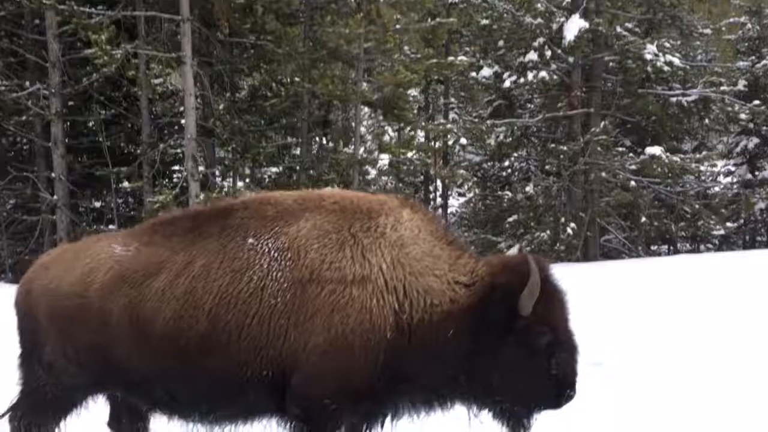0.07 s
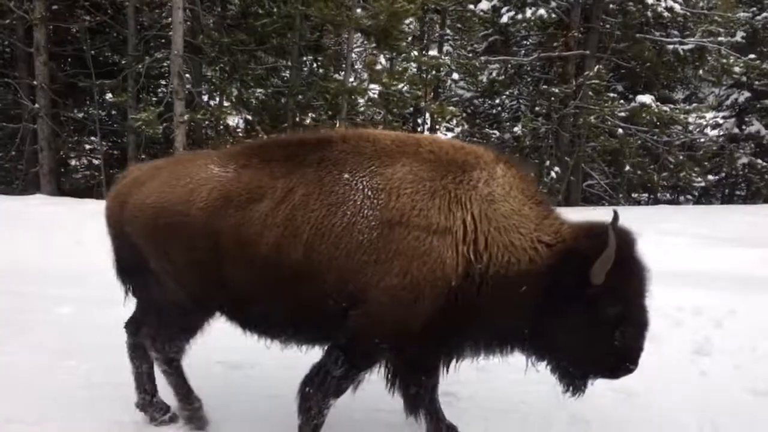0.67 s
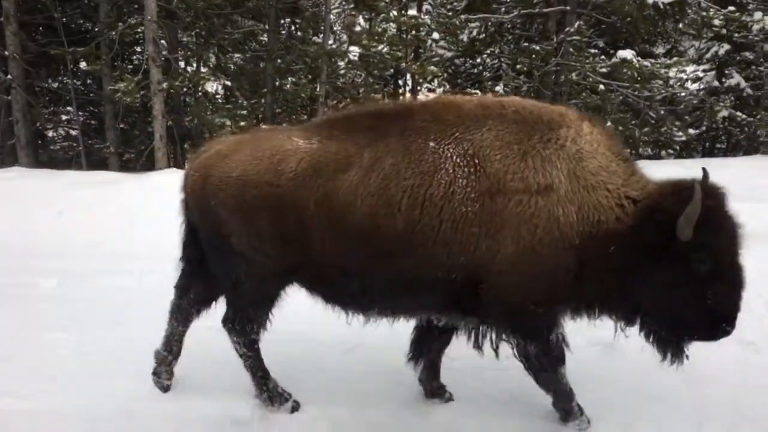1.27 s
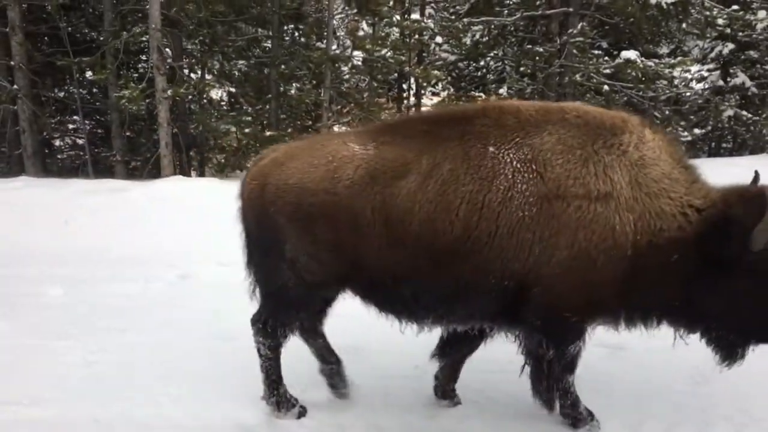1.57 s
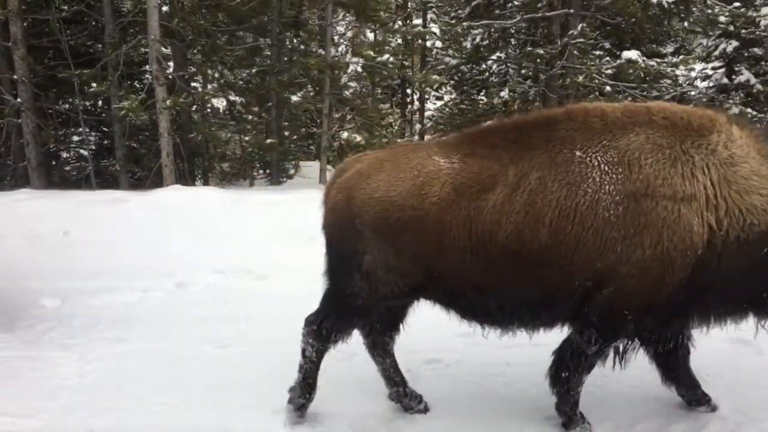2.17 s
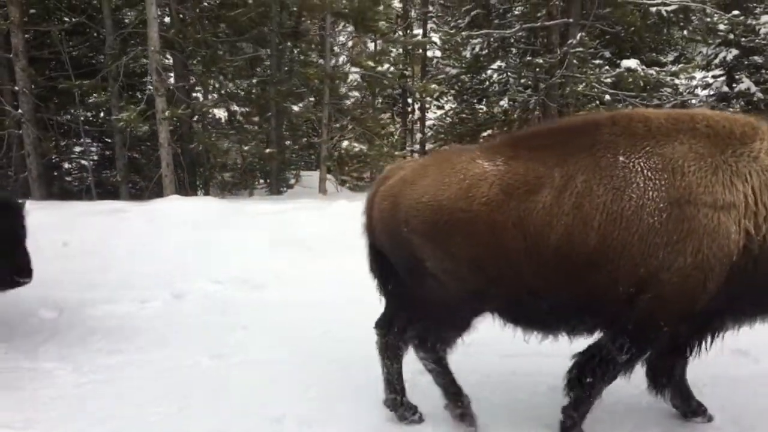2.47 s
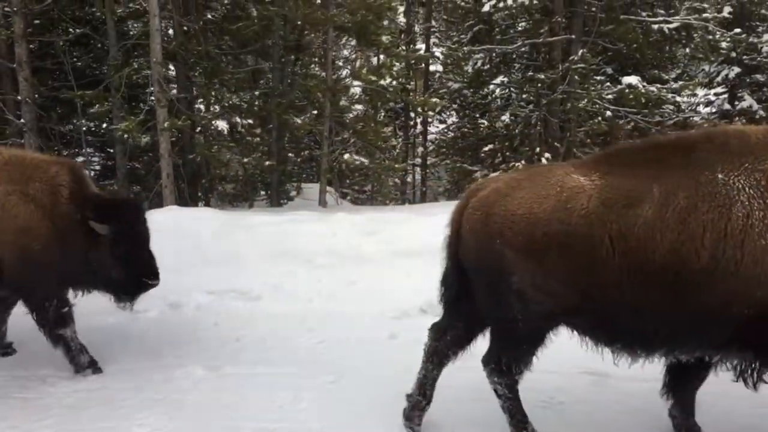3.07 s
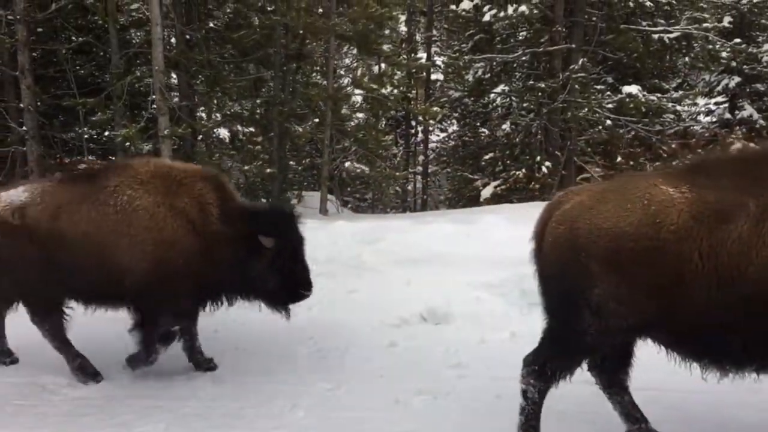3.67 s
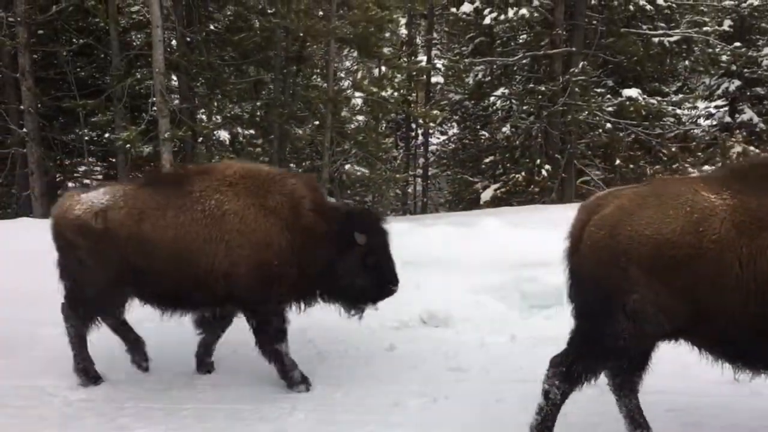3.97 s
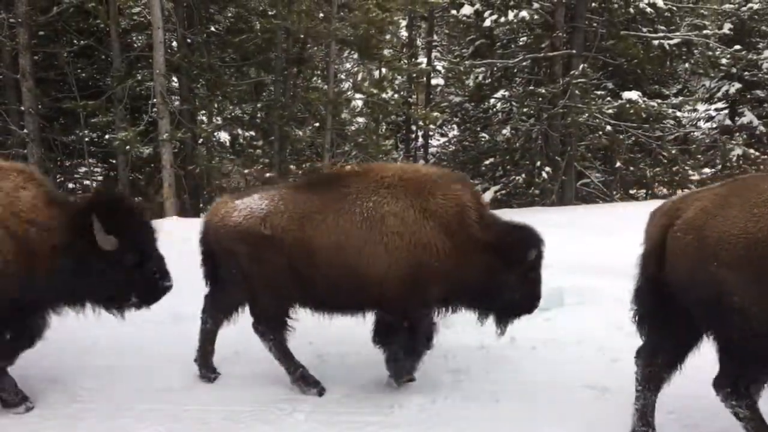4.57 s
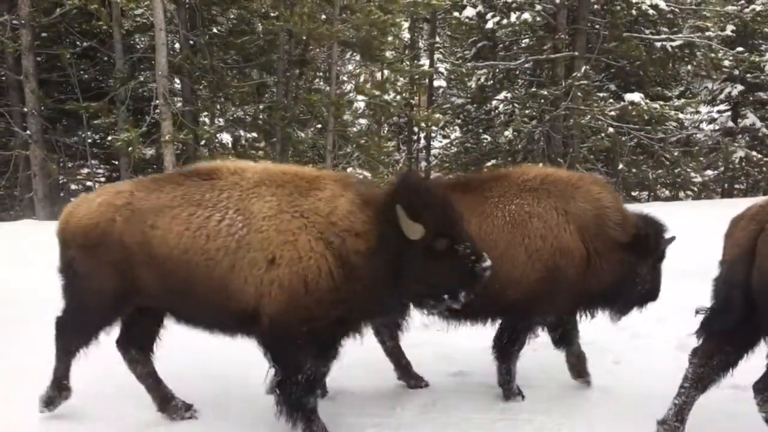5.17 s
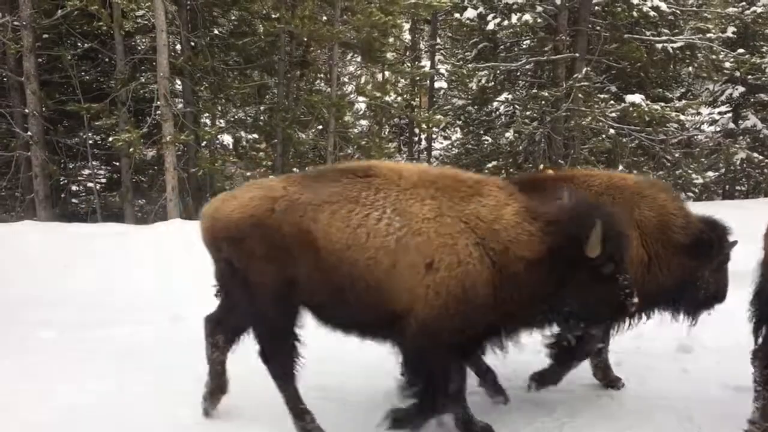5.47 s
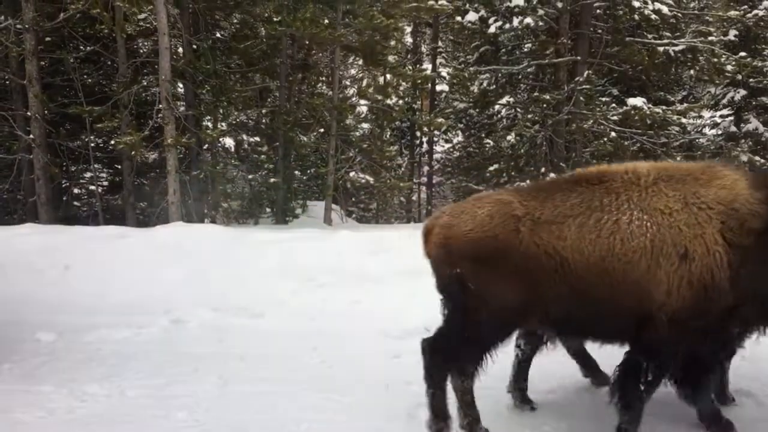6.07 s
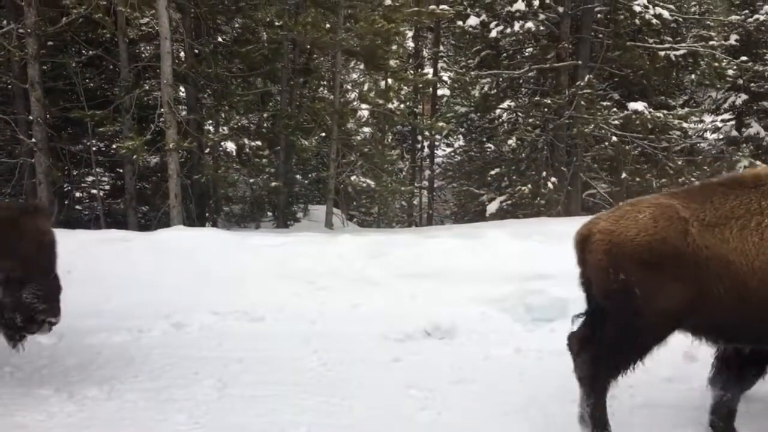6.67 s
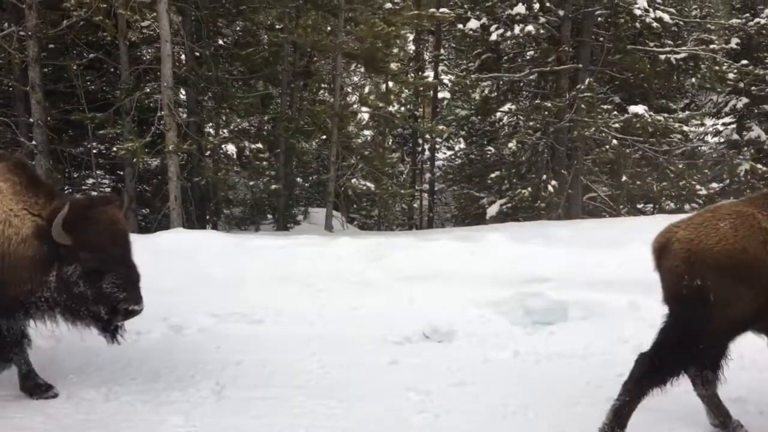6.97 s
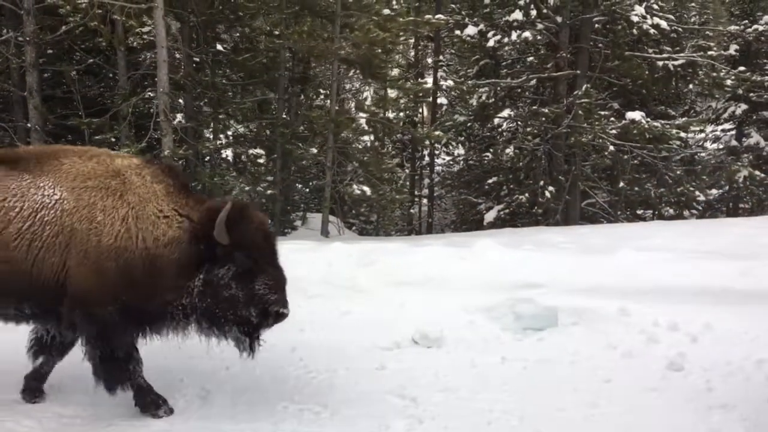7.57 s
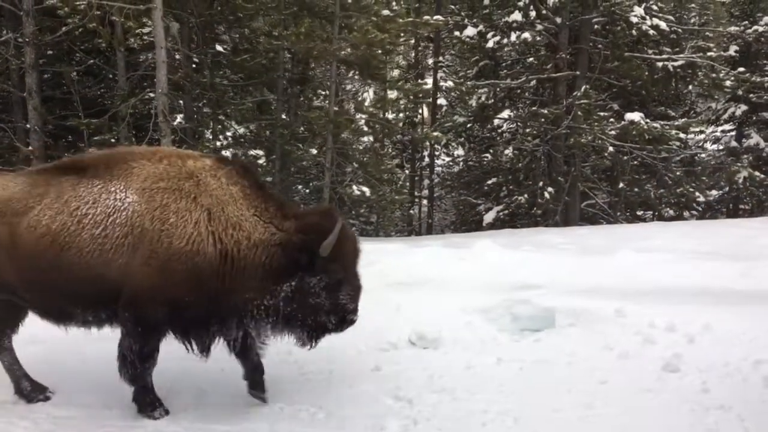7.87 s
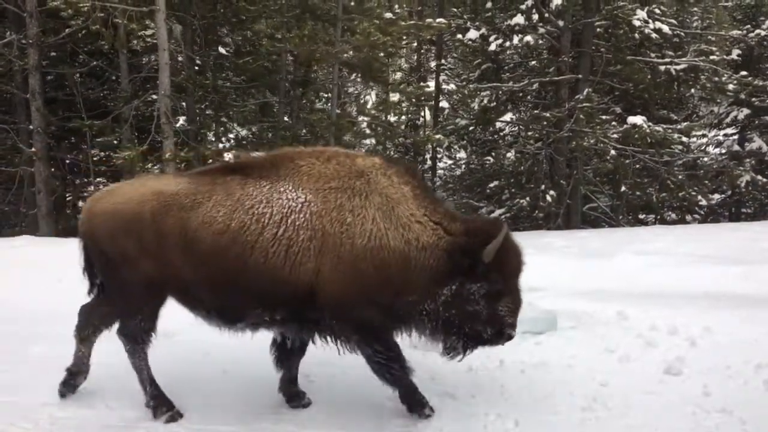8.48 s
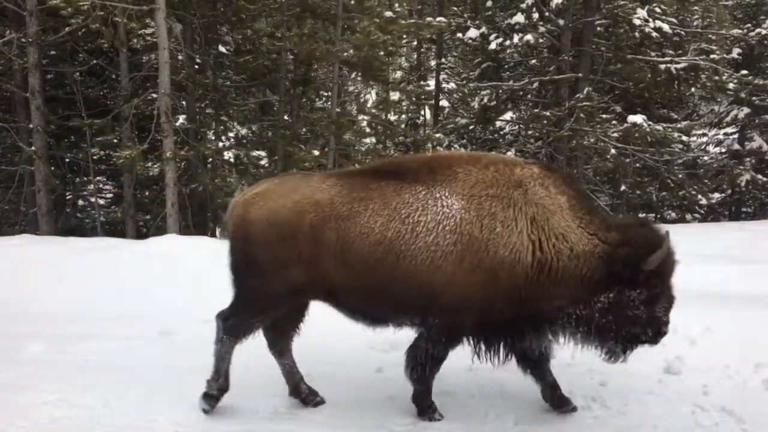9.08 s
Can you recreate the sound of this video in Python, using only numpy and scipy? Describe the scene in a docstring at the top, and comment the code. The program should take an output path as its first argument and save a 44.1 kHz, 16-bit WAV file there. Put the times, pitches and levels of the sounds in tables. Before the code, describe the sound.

Low engine idle heard from inside a vehicle, revving up briefly two times over the steady rush of a heater fan.

```python
"""Snow vehicle idling, heard on board

The engine hunts: two times its speed jumps and slowly sags, and the body rumbles harder at each surge.
Firings drive the exhaust note, boom in the cabin and shake the panels, with occasional dull thumps.
A heater fan blows steadily through resonant ducts.
On top: a brief high hiss at the start, a few tiny rustles and one click."""
import sys
import numpy as np
from scipy import signal
from scipy.fft import rfft, irfft
from scipy.io import wavfile
from scipy.ndimage import uniform_filter1d

SR = 44100
rng = np.random.default_rng(int(sys.argv[2]) if len(sys.argv) > 2 else 0)


def generate_wav(sig):
    """Save sig (samples, or channels by samples) to the path in sys.argv[1] as 16-bit PCM at SR."""
    pcm = np.round(np.clip(np.atleast_2d(sig).T, -1, 1) * 32767).astype(np.int16)
    wavfile.write(sys.argv[1], SR, pcm)


N = 411012
TIME_S = np.arange(N) / SR
BINS_HZ = np.maximum(np.arange(N // 2 + 1) * SR / N, 1)
IDLE_HZ = 38.8   # firing rate at rest

# engine surges: peak t/s, rise/s, peak firing rate/Hz
ENGINE_SURGES = [(1.761, .36, 67), (7.06, .56, 64.5)]
# panel modes: f/Hz, width/Hz, lift/dB
PANEL_RESONANCES = [(239, 9, 4.5), (278, 14, 8)]


def from_db(db):
    """Decibels to gain."""
    return 10 ** (np.asarray(db) / 20)


def unit_rms(x):
    """Scale to rms 1."""
    return x / np.sqrt(np.mean(x ** 2) + 1e-20)


def hump(centre_s, half_s):
    """Gaussian of height 1, down to 1/e at half_s from its centre."""
    return np.exp(-((TIME_S - centre_s) / half_s) ** 2)


def swing_db(rows):
    """Level change from rounded swells and dips."""
    return sum(db * hump(t_s, half_s) for t_s, db, half_s in rows)


def burst_gain(rows):
    """Envelope of short, rounded bursts."""
    return sum(from_db(db) * hump(t_s, half_s) for t_s, db, half_s in rows)


def drift(rate_hz):
    """Slow random wander, rms 1."""
    return unit_rms(irfft(rfft(rng.standard_normal(N)) / (1 + (BINS_HZ / rate_hz) ** 2), N))


def coloured(x, spectrum, resonances=(), skirt_db_per_oct=30):
    """Apply a broad spectrum, a roll-off above it and narrow resonances; rms 1."""
    hz, db = np.transpose(spectrum)
    shape_db = np.interp(np.log(BINS_HZ), np.log(hz), db)
    shape_db -= skirt_db_per_oct * np.maximum(np.log2(BINS_HZ / hz[-1]), 0)
    for centre_hz, width_hz, lift_db in resonances:
        shape_db += lift_db / (1 + (2 * (BINS_HZ - centre_hz) / width_hz) ** 2)
    return unit_rms(irfft(rfft(x) * from_db(shape_db), N))


def steadied(x, span_s):
    """Level out slow swells of a noise, keeping its fast grain."""
    return x / np.sqrt(uniform_filter1d(x ** 2, max(int(span_s * SR), 2)) + 1e-9)


def firing_rate_hz(start_hz=43.75, settle_hz=14, settle_s=.7, sag_hz_per_s=3.35):
    """Hunting engine: each surge climbs smoothly, drops back, then sags towards idle."""
    hz = np.maximum(start_hz - sag_hz_per_s * TIME_S, IDLE_HZ)
    for peak_s, rise_s, peak_hz in ENGINE_SURGES:
        since_s = np.maximum(TIME_S - peak_s, 0)
        rising_hz = IDLE_HZ + (peak_hz - IDLE_HZ) * hump(peak_s, rise_s)
        falling_hz = peak_hz - settle_hz * (1 - np.exp(-since_s / settle_s)) - sag_hz_per_s * since_s
        hz = np.maximum(hz, np.where(TIME_S < peak_s, rising_hz, falling_hz))
    return hz


def firing_level_db(firing_hz, base_db=-40, db_per_oct=6.5, mode_hz=45.9, width_hz=6.5, lift_db=11.5):
    """The firing note grows with speed and booms as it crosses the cabin's lowest mode."""
    # brief swells and dips: t/s, change/dB, half length/s
    swings = [(0.323, 4, 0.14), (.95, -4, 0.26), (1.48, 9.5, 0.048), (2.85, 4, .12), (3.45, -3, 0.18),
              (4.27, -8.5, 0.093), (4.52, 4.5, 0.15), (5.45, -4.5, 0.18), (6.65, 6, 0.1),
              (6.982, 3.5, 0.054), (8.307, -6, 0.22)]
    boom_db = lift_db / (1 + (2 * (firing_hz - mode_hz) / width_hz) ** 2)
    return base_db + db_per_oct * np.log2(firing_hz / IDLE_HZ) + boom_db + swing_db(swings)


def exhaust(phase, firing_hz, overtones_db=-40, third_db=-5, waver_db=2.5, jitter_rad=.24):
    """Firing note, firm at idle and ragged at speed; overtones swell across the pipe's resonance."""
    # pipe response: f/Hz, level/dB
    pipe = [(30, -10), (70, -8.5), (90, -2.5), (128, -5.5), (150, -18), (200, -7)]
    raggedness = .12 + 1.6 * (firing_hz / IDLE_HZ - 1) ** 2
    note = np.sin(phase) * (1 + raggedness * drift(23)) + np.cos(phase) * raggedness * drift(18)
    second = np.sin(2 * phase + rng.uniform(0, 2 * np.pi) + jitter_rad * drift(2.7))
    third = np.sin(3 * phase + rng.uniform(0, 2 * np.pi) + 2 * jitter_rad * drift(8))
    waver = from_db(waver_db * drift(1.7))
    overtones = coloured(waver * (second + from_db(third_db) * third), pipe)
    return from_db(firing_level_db(firing_hz)) * unit_rms(note) + from_db(overtones_db) * overtones


def body_rumble(phase, firing_hz, throb_db=3, boom_db=-34.5, surge_db=3.5, panel_db=-48.5):
    """Each firing gives a rough push that shakes cabin and panels, harder during a surge."""
    # cabin boom spectrum: f/Hz, level/dB
    boom_spectrum = [(15, -39), (24, -30), (33, -3), (55, -3), (72, -4), (84, 1.5), (115, -1), (148, -0.76),
                     (163, -7), (176, -8.5), (205, -20.5), (260, -38)]
    # panel drone spectrum: f/Hz, level/dB
    panel_spectrum = [(150, -14), (200, -5), (260, -1.5), (320, -1), (345, -8.5), (378, -0.5), (410, -10),
                      (490, -7), (540, -21.5), (700, -32)]
    pushes = from_db(throb_db * np.cos(phase)) * rng.standard_normal((2, N))
    boom = steadied(coloured(pushes[0], boom_spectrum), span_s=.15)
    panels = steadied(coloured(pushes[1], panel_spectrum, PANEL_RESONANCES), span_s=.15)
    pull = sum(hump(peak_s, half_s=.32) for peak_s, _, _ in ENGINE_SURGES)
    speed_db = 1.5 * np.log2(firing_hz / IDLE_HZ)
    return from_db(boom_db + surge_db * pull) * boom + from_db(panel_db + speed_db) * panels


def heater_fan(air_db=-50.5, flutter_db=.5, blade_hz=395.4, wobble_hz=.71, blade_db=-60):
    """Turbulent air rings in the ducts; the blades add a faint, slightly unsteady tone."""
    # air rush spectrum: f/Hz, level/dB
    rush = [(200, 0), (450, 2), (570, 3), (650, -1), (800, -0.5), (1220, -6.5), (1500, -3.5), (1850, 2.5),
            (2350, -0.5), (2550, -7), (3300, -6), (3550, -12.5), (4600, -10.5), (4950, -21.5)]
    # its thin treble: f/Hz, level/dB
    treble = [(5200, -21), (6300, -21), (6900, -20), (7800, -23), (9500, -21.5), (10400, -30.5),
              (13000, -32.5), (15700, -38)]
    # duct resonances and hollows: f/Hz, width/Hz, lift/dB
    ducts = [(668, 27, -6.5), (901, 56, 7.5), (1102, 34, 6.5), (1200, 26, 3.5), (1343, 49, 4.5),
             (1400, 25, -3), (1428, 23, 3.5), (1506, 37, 8), (1530, 25, -4), (1630, 81, 6.5),
             (1692, 36, -2.5), (1936, 26, -5.5), (2120, 40, 0), (2147, 35, -7.5), (2280, 340, 4.5),
             (2310, 13, -1), (3075, 47, 8), (3118, 32, -5.5), (3450, 23, 0), (3820, 34, 7), (4420, 40, -3),
             (4630, 110, 3.5), (5650, 480, 8), (8980, 120, 5)]
    # gentle swells and dips of the rush: t/s, change/dB, half length/s
    swings = [(.92, 1.4, .15), (2.15, 1.3, .1), (5.8, 0.7, 0.58), (7.25, -.7, .25), (7.8, 0.8, .17)]
    air = coloured(rng.standard_normal(N), rush + treble, ducts)
    blade_phase = 2 * np.pi * np.cumsum(blade_hz + wobble_hz * drift(2.4)) / SR
    level_db = air_db + swing_db(swings) + flutter_db * drift(28)
    return from_db(level_db) * air + from_db(blade_db) * np.sqrt(2) * np.sin(blade_phase)


def cabin_reflections(x):
    """Near walls add faint delayed copies that ripple the spectrum."""
    # wall reflections: delay/s, level/dB
    walls = [(.00304, -41), (.00561, -24), (.00631, -26), (.00965, -25), (0.0136, -19)]
    return x + sum(from_db(db) * np.interp(TIME_S - delay_s, TIME_S, x) for delay_s, db in walls)


def hiss_and_rustles(hiss_db=-60.5, peak_s=.2, fade_s=.51, stop_s=.655, release_s=.03):
    """A bright hiss fades and is shut off; tiny rustles of the same colour follow."""
    # hiss spectrum: f/Hz, level/dB
    spectrum = [(2000, -26), (3500, -3), (6500, 5.5), (9000, 2.5), (12500, 0.5), (15700, -4)]
    # rustles: t/s, level/dB, half length/s
    rustles = [(.98, -73.5, 0.031), (2.22, -76, 0.036), (5.015, -73, .012), (5.215, -72, .02)]
    release = np.exp(-np.maximum(TIME_S - stop_s, 0) / release_s)
    hiss_gain = from_db(hiss_db) * hump(peak_s, fade_s) * release
    return (hiss_gain + burst_gain(rustles)) * coloured(rng.standard_normal(N), spectrum)


def panel_swells():
    """The panels briefly drone louder around their lowest modes."""
    # swells: t/s, level/dB, half length/s
    swells = [(1.0, -51.5, 0.1), (2.11, -41, 0.037), (2.4, -43.5, 0.13), (7.46, -44.5, 0.15),
              (8.09, -41.5, 0.037), (9.03, -52, 0.036)]
    # swell spectrum: f/Hz, level/dB
    spectrum = [(150, -13), (200, 0.5), (290, -1.5), (350, -9.5), (450, -17)]
    drone = coloured(rng.standard_normal(N), spectrum, PANEL_RESONANCES)
    return burst_gain(swells) * steadied(drone, span_s=.055)


def body_thumps():
    """Now and then the cabin gives a harder, dull shudder."""
    # thumps: t/s, level/dB, half length/s
    thumps = [(1.005, -33, .015), (3.455, -26.5, 0.015), (4.355, -26, .015), (5.24, -30.5, 0.025),
              (8.07, -25, 0.023)]
    # thump spectrum: f/Hz, level/dB
    spectrum = [(40, -34), (90, 12), (150, -1.5), (200, -6.5), (290, -20), (380, -24)]
    shudder = coloured(rng.standard_normal(N), spectrum)
    return burst_gain(thumps) * steadied(shudder, span_s=.023)


def tick(t_s=5.424, level_db=-36):
    """One tiny bright click."""
    click = np.zeros(N)
    click[round(t_s * SR)] = from_db(level_db)
    return click


def scene():
    """Engine speed drives exhaust and body rumble; the fan runs on its own. Mono."""
    firing_hz = firing_rate_hz()
    phase = 2 * np.pi * np.cumsum(firing_hz) / SR
    engine = exhaust(phase, firing_hz) + body_rumble(phase, firing_hz) + panel_swells() + body_thumps()
    return (engine + cabin_reflections(heater_fan()) + hiss_and_rustles() + tick())[None]


def record(dry, start_s=.12, low_cut_hz=25, high_cut_hz=15650):
    """Brief opening silence; the microphone drops the deepest bass, and the top is cut."""
    gate = np.clip((TIME_S - start_s) / .001, 0, 1)
    highpass = signal.butter(4, low_cut_hz, "high", fs=SR, output="sos")
    lowpass = signal.ellip(10, .1, 80, high_cut_hz, fs=SR, output="sos")
    return signal.sosfilt(lowpass, gate * signal.sosfilt(highpass, dry))


dry = scene()
out = record(dry)
generate_wav(out)
```